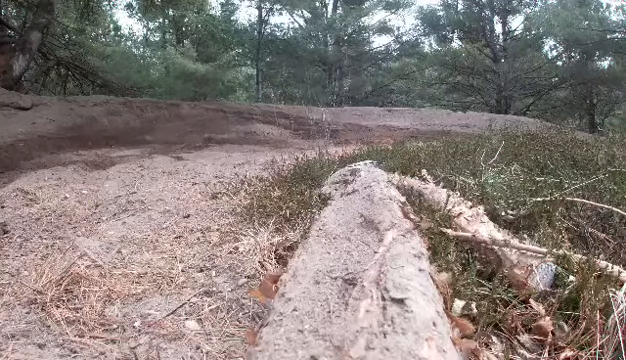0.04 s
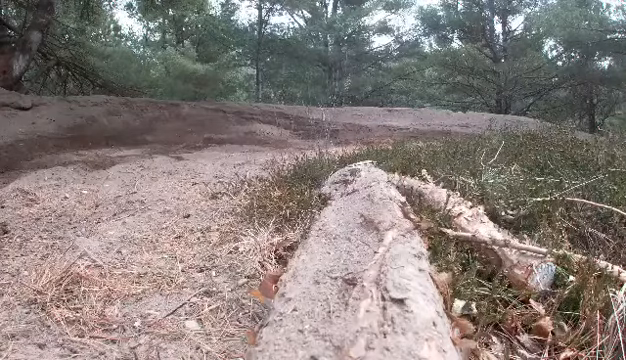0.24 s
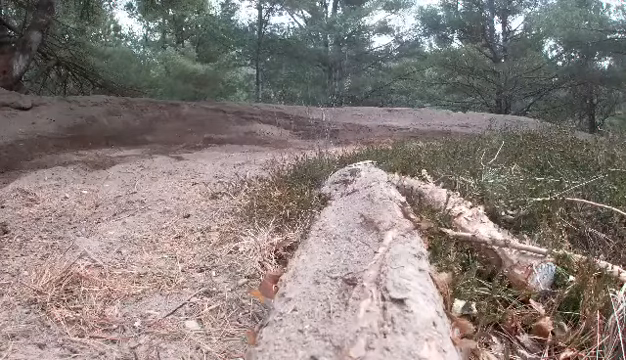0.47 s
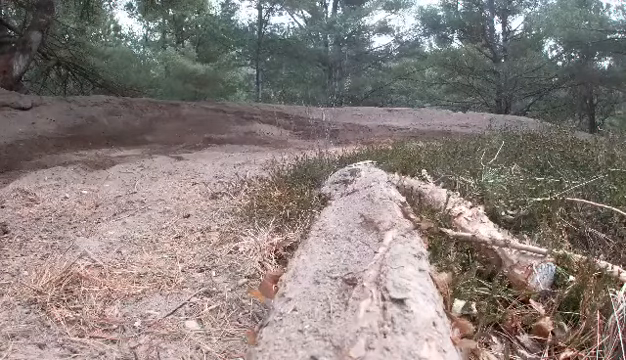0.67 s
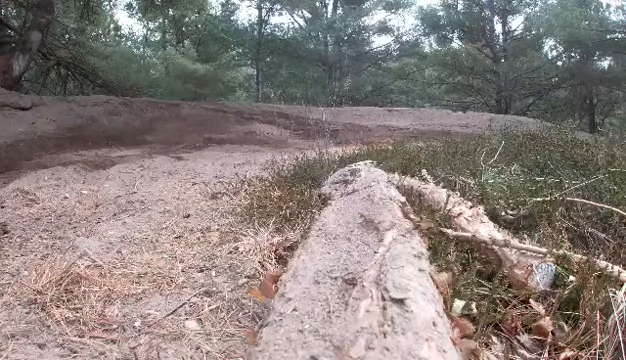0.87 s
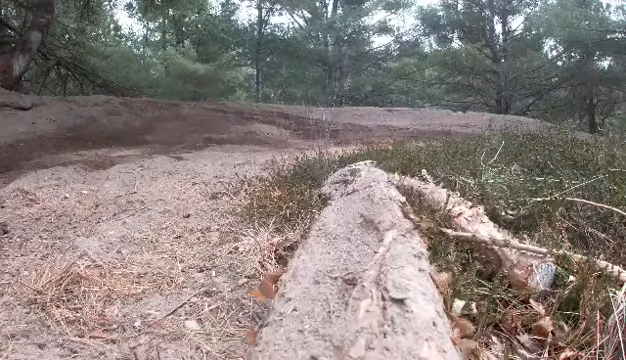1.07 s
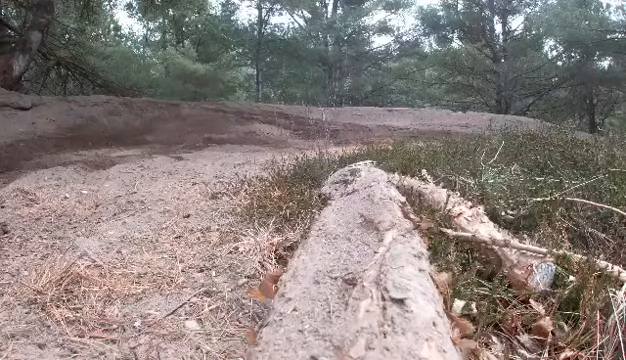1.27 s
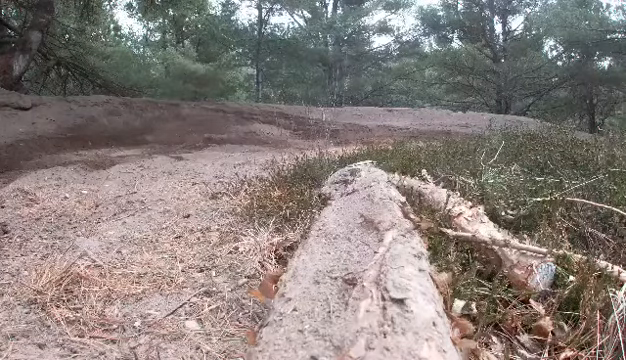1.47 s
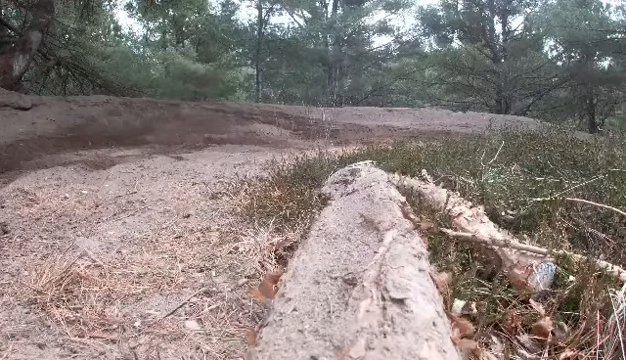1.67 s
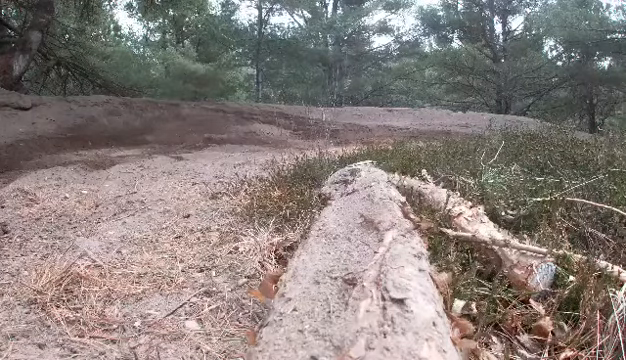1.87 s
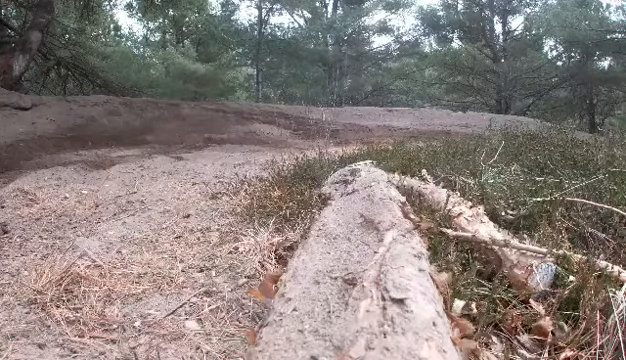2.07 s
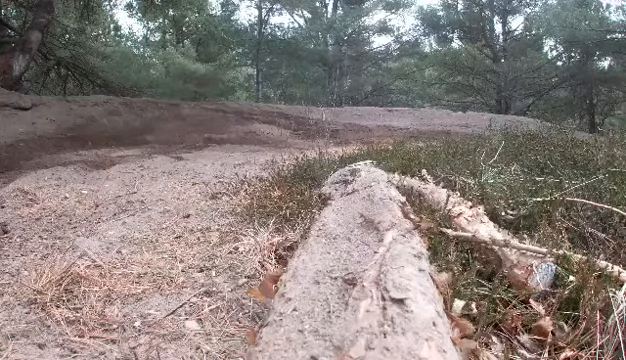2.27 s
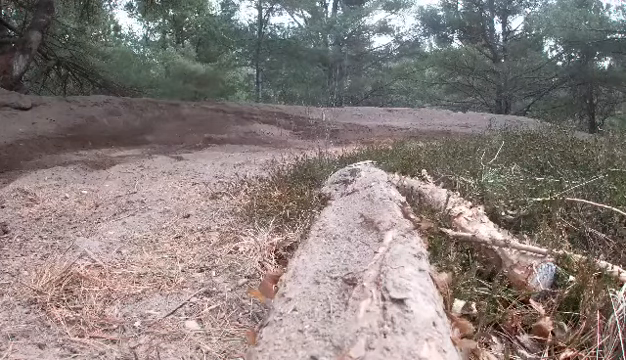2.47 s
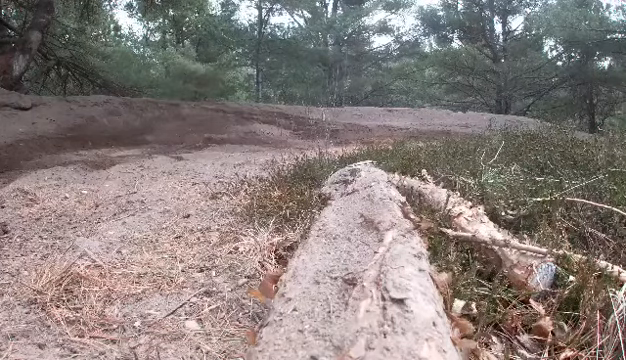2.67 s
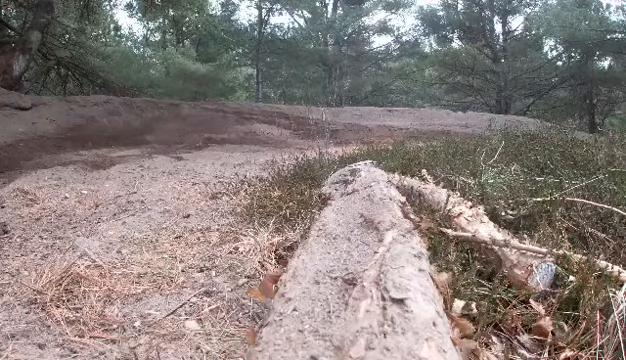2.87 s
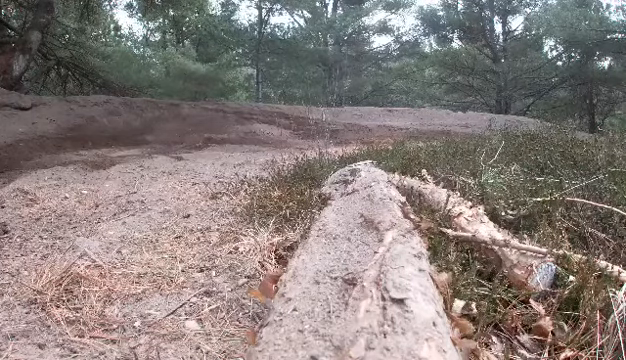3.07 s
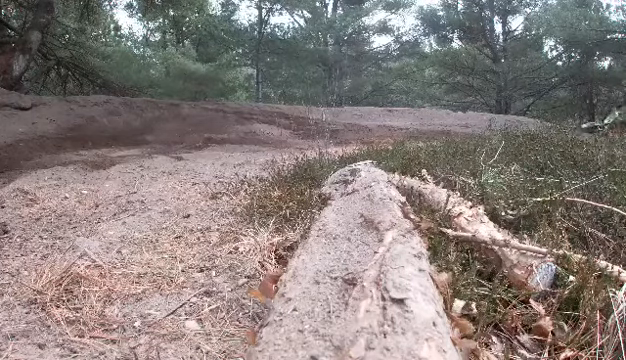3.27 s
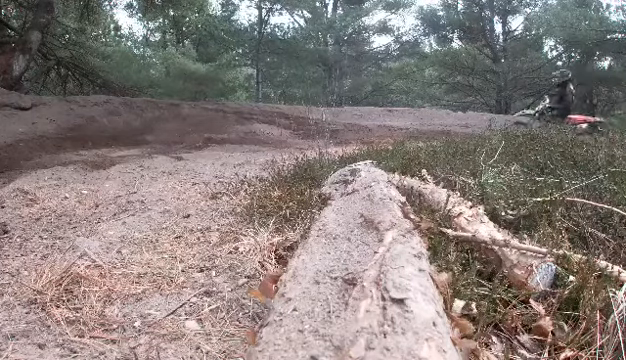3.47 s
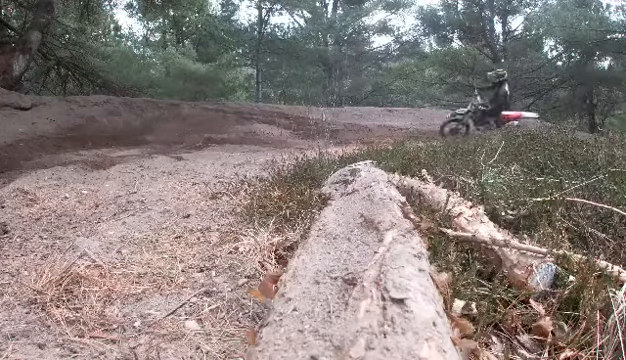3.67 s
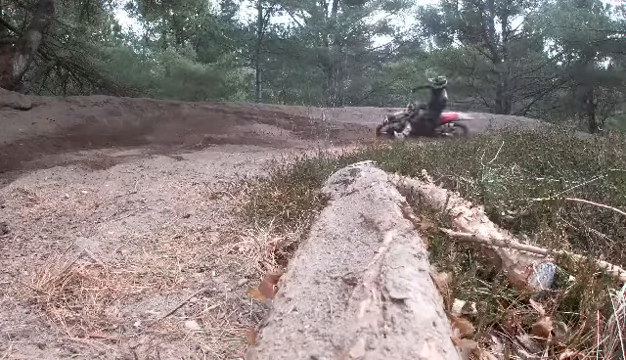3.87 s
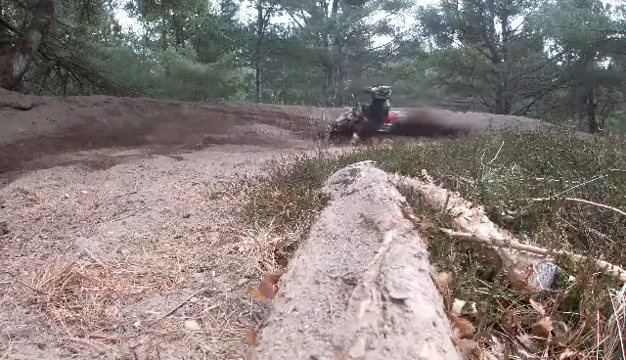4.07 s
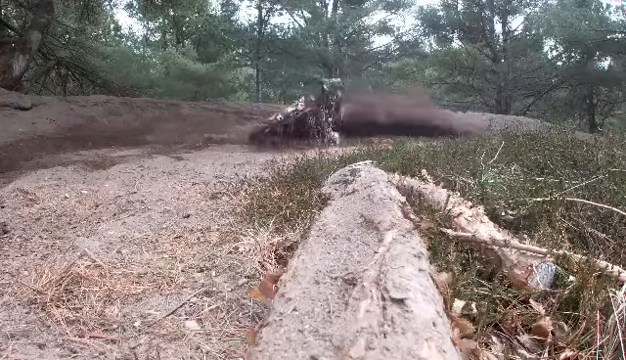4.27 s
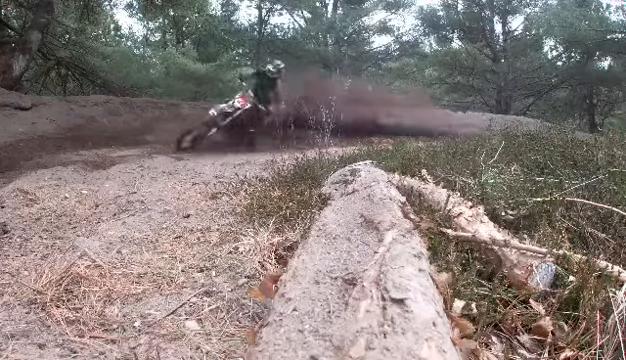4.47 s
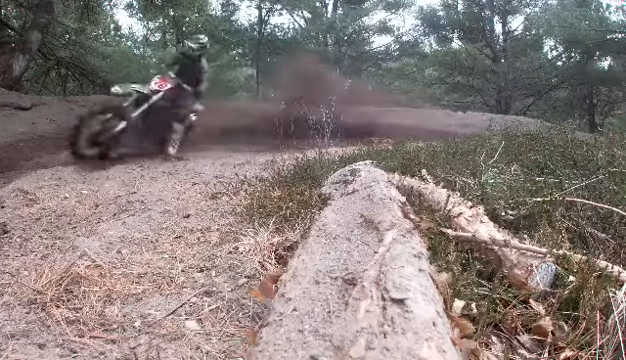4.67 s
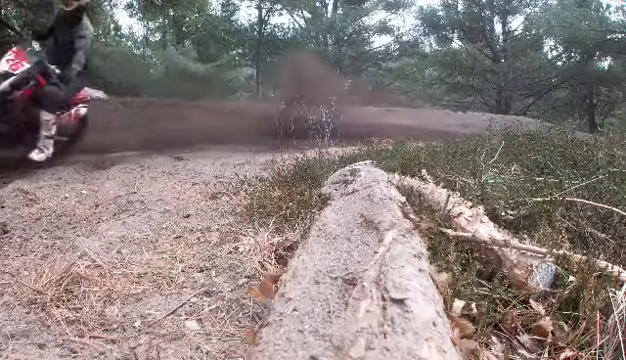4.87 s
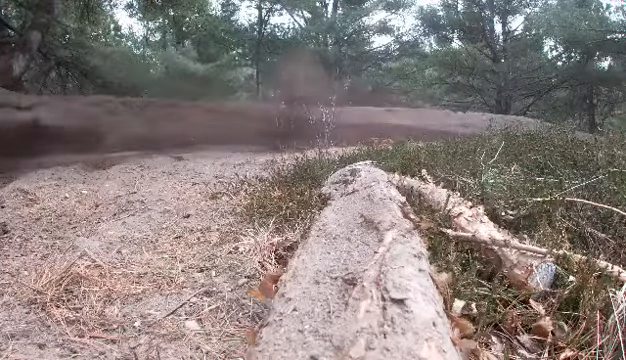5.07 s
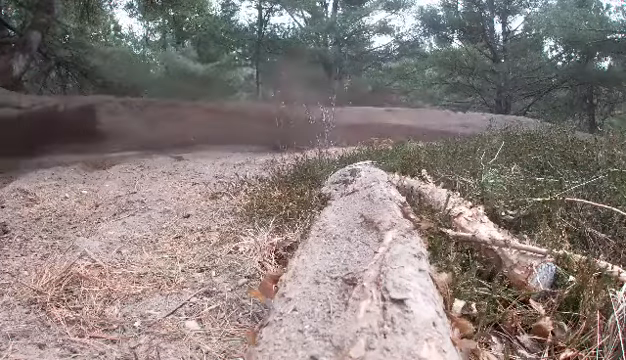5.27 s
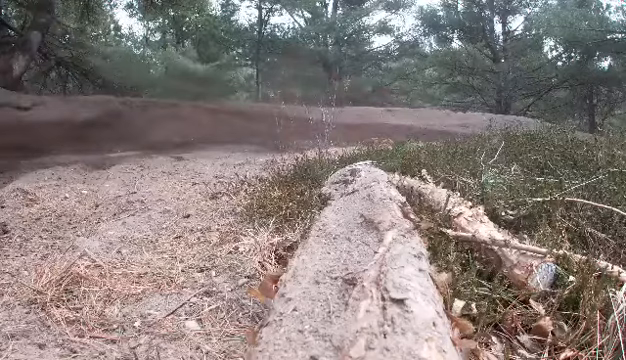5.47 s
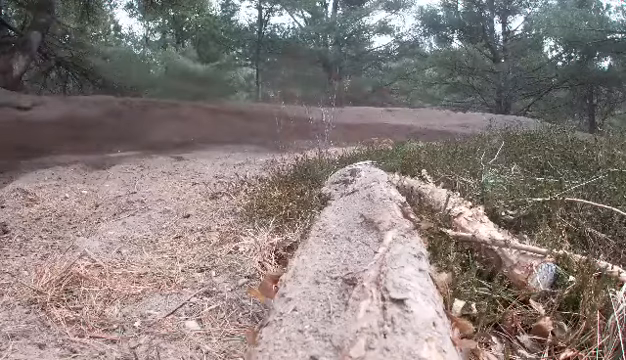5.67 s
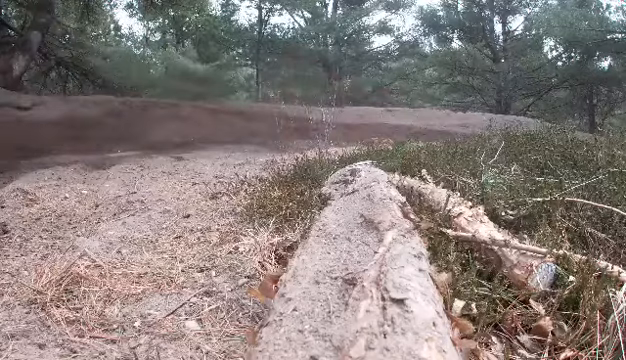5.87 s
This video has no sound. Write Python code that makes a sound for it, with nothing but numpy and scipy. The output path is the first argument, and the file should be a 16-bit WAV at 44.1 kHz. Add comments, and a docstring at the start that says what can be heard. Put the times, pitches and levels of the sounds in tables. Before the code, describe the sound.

Outdoors by a woodland dirt track, a low soft rumble lies underneath. At 0 s a departing dirt bike leaves a wavering low drone and bright hiss, gone by about 0.9 s. Beneath it a four-stroke single idles out of sight, with dull uneven thuds about eighteen per second. It gives a short blip near 1.1 s, settles, then revs from 1.9 s to a muffled peak around 2.5 s, sags, and jabs again at 3.2-3.3 s, with only faint patchy hiss above. Around 3.8-3.9 s it clears the bank: the sound abruptly becomes much louder and brighter, a ripping bark of sharp cracks over hiss. It pulls hard to 4.3 s, eases and drops in pitch to 4.7 s, then surges from 4.85 s, climbing into a heavy, dense, buzzing roar, loudest about 5.0-5.5 s. From 5.6 s the throttle eases, level and pitch fall, crackling continues, and pitch lifts slightly at the 5.9 s end.

```python
"""Over an idling single-cylinder four-stroke dirt bike another bike fades away; the first blips behind a bank in
the woods, then comes into the open, powers through a bend and passes close. Each firing is a puff that rings
the exhaust as a low thud and, in direct sight, a sharp crack of shock front and turbulence. Behind the bank the
treble is a patchy hiss; in the open, cracks ring over a hiss. Filtered noise gives the low rumble of the woods."""
import sys
import numpy as np
from scipy import signal
from scipy.fft import rfft, irfft, next_fast_len
from scipy.io import wavfile
from scipy.ndimage import uniform_filter1d

SR = 44100
rng = np.random.default_rng(int(sys.argv[2]) if len(sys.argv) > 2 else 0)


def elevation(decibels):
    """Turn decibel levels (scalar or array-like) into linear amplitude ratios."""
    levels = np.asarray(decibels, float)
    return 10 ** (levels / 20)


def wrap_up_sound(samples):
    """Save the sound to the file named by the first command line argument, as 16-bit audio."""
    columns = np.atleast_2d(samples).T
    # keep every value between -1 and 1, then stretch to whole-number steps
    tamed = np.clip(columns, -1, 1)
    steps = np.round(tamed * 32767).astype(np.int16)
    wavfile.write(sys.argv[1], SR, steps)


N = 261513


def in_time(rows):
    """Columns of a curve, one value a sample; the first column of rows is time in seconds."""
    s, *columns = np.transpose(rows)
    return [np.interp(np.arange(N) / SR, s, c) for c in columns]


def colour(x, points):
    """Minimum-phase filter through (Hz, dB) points, by folding the cepstrum."""
    size = next_fast_len(N + 8192)
    hz, db = np.transpose(points)
    grid_hz = np.maximum(np.arange(2049) * SR / 4096, 1)
    log_gain = np.interp(np.log(grid_hz), np.log(hz), db) * np.log(10) / 20
    cepstrum = irfft(log_gain)
    cepstrum[1:2048] *= 2
    cepstrum[2049:] = 0
    impulse = irfft(np.exp(rfft(cepstrum)))
    return irfft(rfft(x, size) * rfft(impulse, size), size)[..., :N]


def resonance(x, hz, width_hz):
    """Two-pole resonance with gain 1 on top."""
    r = np.exp(-np.pi * width_hz / SR)
    b = [(1 - r * r) / 2, 0, (r * r - 1) / 2]
    a = [1, -2 * r * np.cos(2 * np.pi * hz / SR), r * r]
    return signal.lfilter(b, a, x)


def even(x):
    """Running rms brought to 1."""
    power = uniform_filter1d(uniform_filter1d(x ** 2, 5000), 5000)
    return x / np.sqrt(np.maximum(power, 0) + 1e-14)


def cut(x, hz, kind):
    """Steep high- or low-pass."""
    return signal.sosfilt(signal.butter(4, hz, kind, fs=SR, output="sos"), x)


def nearly_mono(spectrum, side_db):
    """Coloured noise, mid of rms 1, slightly different in the two channels."""
    mid, side = colour(rng.standard_normal((2, N)), spectrum)
    return (mid + elevation(side_db) * side * [[1], [-1]]) / np.std(mid)


def drift(rate_per_s):
    """Slow random curve of spread about 1."""
    return np.interp(np.arange(N) * rate_per_s / SR, np.arange(200), rng.standard_normal(200)) * 1.2


def low_exhaust(turns, at, near, steady, thud_db, bark_db, crank_db):
    """Puffs ring the exhaust as thud and bark; revving adds a clean note, the open adds crank hum and rasp."""
    # Modes of the exhaust. Each row: centre in Hz, width in Hz, relative level in dB.
    thud_modes = [(84, 119, -4.5), (145.6, 85.7, 3), (186.7, 51.5, -4)]
    bark_modes = [(240.4, 93, 10), (343, 100, 1), (469, 23, -10.5)]
    # Turbulent roughness of the exhaust. Each row: frequency in Hz, relative density in dB per Hz.
    rasp_spectrum = [(30, -16), (60, -12), (150, -9), (350, -12), (470, -13), (700, -37), (1000, -51)]
    # Clean orders above the bark, in the open. Each row: time in seconds, level over thud in dB.
    upper_orders = [(3.8, -18), (4.25, -20), (4.45, -6), (4.85, -5), (5.07, -19), (5.2, -16.5),
                    (5.55, -12.5), (5.72, -34), (5.93, -22)]
    firing_tone_db, crank_overtone_db = -16, -21   # over thud
    thud_yields = .4   # share by which the thud gives way to the far note
    knock_db = -27   # top of the far thump over bark

    puffs = firing_puffs(at, near, steady)
    echoed = with_echoes(puffs, near)
    far = thump(echoed)
    # from behind the bank the note is narrower
    behind = cut(cut(echoed, 490, "low"), 65.0, "high")
    heard = behind * (1 - near) + cut(echoed, 560, "low") * near

    crank = near * elevation(crank_db) * np.sqrt(2) * np.cos(4 * np.pi * turns + 0.032)
    thud = (pipe(heard, thud_modes, cut_hz=49.5) + crank) / np.sqrt(1 + near * elevation(2 * crank_db))
    thud = near * thud + (1 - near) * far
    thud += near * elevation(firing_tone_db) * np.cos(2 * np.pi * turns + 12.3)
    thud += near * elevation(crank_overtone_db) * np.sqrt(2) * np.cos(8 * np.pi * turns + 0.5)
    thud += (1 - near) * steady * (far_note(turns) - thud_yields * thud)

    bark = elevation(bark_db - 2.9 * (2.5 - near)) * pipe(heard, bark_modes, cut_hz=222)
    # rasp grows half as fast in dB as the thud
    rasp = near * elevation(-48 + .5 * (thud_db + 40)) * nearly_mono(rasp_spectrum, side_db=-24)
    upper_band = even(cut(cut(puffs, 410, "high"), 800, "low"))
    upper = near * elevation(thud_db + in_time(upper_orders)[0]) * upper_band
    knock = (1 - near) * elevation(bark_db + knock_db) * even(cut(cut(puffs, 330, "high"), 450, "low"))
    return elevation(thud_db) * thud + bark + rasp + upper + knock


def firing_puffs(at, near, steady):
    """One pressure puff a firing, uneven behind the bank; at idle there many are followed by a weaker beat."""
    afterbeat_share, afterbeat_db = .6, -4.5
    puffs = np.full(N, 1e-18)
    early = (SR * (0.00388 + 0.00326 * near[at])).astype(int)   # the thud leads the crack
    jitter_s = .0012 * rng.standard_normal(len(at)) * (1 - near[at]) * (1 - .7 * steady[at])
    early += (SR * jitter_s).astype(int)
    puffs[at - early] = -elevation(rng.standard_normal(len(at)) * (3.4 - 2.6 * near[at]))
    chance, late = rng.random((len(at), 2)).T
    after = np.minimum(at + (SR * (.012 + .022 * late)).astype(int), N - 1)
    followed = chance < afterbeat_share * (1 - steady[at])
    puffs[after] -= elevation(afterbeat_db) * followed * (1 - near[at])
    return puffs


def with_echoes(puffs, near):
    """Bank and trunks return delayed copies, 8 dB weaker in the open."""
    # Each row: delay in seconds, level behind the bank in dB.
    echo_rows = [(.0085, -21), (0.02, -10.5), (0.031, -13), (0.041, -27)]
    heard = puffs.copy()
    for delay_s, db in echo_rows:
        lag = int(delay_s * SR)
        heard[lag:] += elevation(db - 8 * near[lag:]) * puffs[:-lag]
    return heard


def pipe(puffs, modes, cut_hz):
    """Pressure puffs ring the exhaust pipe in modes of alternating sign."""
    rings = sum((-1) ** k * elevation(db) * resonance(puffs, hz, width_hz)
                for k, (hz, width_hz, db) in enumerate(modes))
    return even(cut(rings, cut_hz, "high"))


def thump(puffs):
    """Each puff heard from afar: a sudden, short tone that starts high and sags in pitch."""
    end_hz, drop_hz, drop_s = 118, 200, .003
    lag_s, rise_s, fall_s = .005, .0015, .009
    t = np.maximum(np.arange(2600) / SR - lag_s, 0)
    cycles = end_hz * t + drop_hz * drop_s * (1 - np.exp(-t / drop_s))
    shape = np.sin(2 * np.pi * cycles) * np.exp(-t / fall_s) * (1 - np.exp(-t / rise_s))
    return even(signal.fftconvolve(-puffs, shape)[:N])


def far_note(turns):
    """Revving behind the bank: the engine orders near the note's centre, as clean tones."""
    # Strongest region of the note. Each row: time in seconds, centre in Hz.
    note_centre = [(1.05, 135.6), (1.3, 109), (2.2, 137), (2.53, 205), (2.66, 150), (2.8, 135), (3.15, 138),
                   (3.32, 140), (3.7, 104.7)]
    width_hz = 46
    centre_hz, rate = in_time(note_centre)[0], np.gradient(turns) * SR
    return sum(np.exp(-((k * rate - centre_hz) / width_hz) ** 2) * np.sin(2 * np.pi * k * turns)
               for k in range(2, 9))


def swells_and_dips():
    """Brief swells and dips of thud, bark and treble, each coming quickly and dying away."""
    # Each row: time in seconds, change of thud in dB, of bark over thud in dB, of treble in dB.
    change_rows = [(1.035, 9, 6, 5), (1.4, 1.5, -15, 2), (1.72, -9, 12, 5.5), (2.55, -3.5, 14, 4),
                   (3.204, 3, 19.5, 4.5), (3.3, 8, -4, 2.5)]
    onset_s, decay_s = 0.045, 0.12
    s, *changes_db = np.transpose(change_rows)
    since = np.arange(N) / SR - s[:, None]
    onset = np.clip(1 + since / onset_s, 0, 1)
    decay = np.exp(-np.abs(since) / decay_s)
    return np.array(changes_db) @ np.where(since < 0, onset, decay)


def treble(at, near, level_db, top_db, low_hz, high_hz, low_db, high_db, crack_db, burst_db):
    """Cracks over hiss in a lower and a top part, each with its own level; the hiss is patchy behind the bank."""
    # Colours in the open and behind the bank. Each row: frequency in Hz, relative density in dB per Hz.
    open_spectrum = [(290, -44), (500, -23), (680, -10), (1050, -2), (1500, -6.5), (3570, -3.5), (5690, -1),
                     (7460, -6), (9670, -12.5), (11000, -23.5), (14300, -123), (22000, -120)]
    far_spectrum = [(350, -42), (600, -11), (1280, -4.5), (3680, -3.5), (7010, -7.5), (9740, -20.5),
                    (11000, -25), (14300, -105), (22000, -120)]
    share = elevation(crack_db - 16.0 * (1 - near))
    sharp = colour(cracks(at, low_hz, high_hz, low_db, high_db, burst_db), open_spectrum)
    tail = rng.standard_normal(6000) * np.exp(-np.arange(6000) / SR / 0.012)   # noisy tail of each crack
    hiss = even(signal.fftconvolve(sharp, tail)[:N]) * near * elevation(-2.5)
    hiss = hiss + near * nearly_mono(open_spectrum, side_db=-27.0)
    hiss = hiss + (1 - near) * patchy(nearly_mono(far_spectrum, side_db=-34.0))
    both = share * even(sharp) + even(hiss)
    lower = even(cut(both, 3660, "low"))
    top = even(cut(cut(both, 2444, "high"), 19100, "low"))
    return elevation(level_db) * lower + elevation(top_db) * top


def cracks(at, low_hz, high_hz, low_db, high_db, burst_db):
    """A shock front and a short, brighter burst of turbulence per firing, swelling in two moving resonances."""
    # Shock front, soft until the bike is near and again as it rides off.
    # Each row: time in seconds, relative front strength.
    front_rows = [(3.85, .45), (4.05, .85), (5.5, .8), (5.72, .45)]
    lag_s, alike = .0008, .55   # turbulence follows the front, much like the burst before
    ring_width, ring_scatter = .52, .045   # width over pitch; pitch spread from firing to firing
    jitter_s = .00007
    out, t = np.zeros(N + 2048), np.maximum(np.arange(1024) / SR - lag_s, 0)
    shape = np.exp(-t / .0022) * (1 - np.exp(-t / .0006))
    fresh = np.diff(rng.standard_normal((len(at), 1025)))
    eddies = signal.lfilter([np.sqrt(1 - alike ** 2)], [1, -alike], fresh, axis=0)
    front, = in_time(front_rows)
    for i, eddy, (slip, low_off, high_off) in zip(at, eddies, rng.standard_normal((len(at), 3))):
        low_ring = low_hz[i] * (1 + ring_scatter * low_off)
        high_ring = high_hz[i] * (1 + ring_scatter * high_off)
        start = i + int(round(SR * jitter_s * slip))
        burst = elevation(burst_db[i]) * eddy * shape
        spit = burst.copy()   # the top end is mostly turbulence
        spit[0], burst[0] = -.3 * front[i], -1.01 * front[i]
        low = resonance(burst, low_ring, ring_width * low_ring)
        low = resonance(low, low_ring, ring_width * low_ring)
        burst[0] = -0.52 * front[i]
        high = resonance(burst, high_ring, ring_width * high_ring)
        high = resonance(high, high_ring, ring_width * high_ring)
        strength = elevation(rng.normal(0, 1.1))
        crack = elevation(-2.5) * spit + elevation(low_db[i]) * low - elevation(high_db[i]) * high
        out[start:start + 1024] += strength * crack
    return out[:N]


def patchy(x):
    """Each band of a noise swells and sinks on its own."""
    # Band edges in Hz, one a row.
    edges_hz = [1600, 2800, 4600]
    depth_db, rate_per_s = 2.2, 11.0
    out = 0
    for hz in edges_hz:
        band = signal.sosfiltfilt(signal.butter(2, hz, fs=SR, output="sos"), x)
        out = out + elevation(depth_db * drift(rate_per_s)) * band
        x = x - band
    return out + elevation(depth_db * drift(rate_per_s)) * x


def leaving_bike():
    """A few wavering low orders and a bright hiss that holds, then both die away."""
    # Each row: time in seconds, firings per second, level in dB before a common 4.5 dB cut.
    leaving_rows = [(0, 72, -43), (.15, 84, -46.5), (.27, 74, -57), (.45, 80, -57), (.75, 78, -63.5)]
    # Each row: multiple of the firing rate, relative level in dB.
    orders = [(2, -2.5), (3, 9.5), (4, -1.5), (5, -5)]
    # Each row: frequency in Hz, relative density in dB per Hz.
    hiss_spectrum = [(290, -70), (500, -15), (609, -23), (1270, 2), (1450, -2), (3670, 0.5), (9320, -23),
                     (10500, -43), (11500, -86), (15000, -113), (22000, -120)]
    hiss_db, hold_s, fall_db_per_s = -41, 0.19, 38.5
    rate, level_db = in_time(leaving_rows)
    turns, t = np.cumsum(rate) / SR, np.arange(N) / SR
    alive = np.clip((leaving_rows[-1][0] + 0.23 - t) / 0.15, 0, 1)
    fading_db = hiss_db - fall_db_per_s * np.maximum(t - hold_s, 0)
    hiss = elevation(fading_db) * nearly_mono(hiss_spectrum, side_db=-41)
    tones = sum(elevation(db) * np.sin(2 * np.pi * k * turns + k) for k, db in orders)
    return hiss + alive * elevation(level_db - 4.5) * tones


def woods_rumble():
    """Low coloured noise at a slowly moving level."""
    # Each row: frequency in Hz, relative density in dB per Hz.
    rumble_spectrum = [(12, -53), (20, -9), (48, 3.5), (95, 3.5), (140, -14), (210, 2), (512, -24),
                       (700, -37), (910, -30), (1540, -120)]
    # Each row: time in seconds, level in dB.
    rumble_level = [(0, -58.5), (2, -53.5), (3, -52), (3.7, -52), (5.93, -55)]
    return elevation(in_time(rumble_level)[0]) * nearly_mono(rumble_spectrum, side_db=-50)


def scene():
    """Both bikes over the low rumble of the woods."""
    # Engine speed. Each row: time in seconds, firings per second.
    revs = [(0.0, 17.86), (0.91, 18.12), (1.1, 25.75), (1.37, 17.54), (1.82, 17.79), (1.96, 25.49),
            (2.18, 24.8), (2.3, 32.64), (2.46, 38.11), (2.55, 38.7), (2.66, 35.2), (2.96, 29.0),
            (3.11, 27.648), (3.28, 43.22), (3.5, 32.5), (3.7, 26.0), (3.77, 27.85), (3.94, 53.51),
            (4.0, 47.48), (4.15, 51.8), (4.25, 51.52), (4.45, 43.95), (4.69, 39.74), (4.96, 52.98),
            (5.14, 67.14), (5.21, 66.3), (5.28, 69.2), (5.36, 65.9), (5.45, 72.68), (5.57, 71.88),
            (5.78, 52.7), (5.93, 60.83)]
    # Exhaust before swells and dips. Each row: time in seconds, thud in dB, treble in dB.
    exhaust = [(0, -44, -60), (.25, -51, -50.5), (.78, -47, -60), (.9, -47, -58), (1.2, -49.5, -61),
               (1.35, -50, -58.5), (1.63, -47, -60), (1.75, -43, -55.5), (1.84, -40, -57),
               (1.95, -41, -57.5), (2.4, -44.5, -54.5), (2.62, -47.5, -53), (2.85, -44, -54.5),
               (3.15, -50, -55.5), (3.33, -49.5, -53), (3.48, -44.5, -55), (3.7, -48.5, -54.5),
               (3.81, -44.5, -39.5), (3.93, -41.5, -27.5), (4.03, -42.5, -30.5), (4.09, -38, -25.5),
               (4.28, -39.5, -28), (4.43, -43.5, -34.5), (4.61, -43.5, -34), (4.86, -40, -25),
               (5.02, -32.5, -25), (5.25, -30.5, -24.5), (5.5, -33, -24.5), (5.66, -42, -31),
               (5.85, -43.5, -34.5), (5.93, -45.5, -34.5)]
    # Bark in the open. Each row: time in seconds, relative level over thud in dB.
    bark_open = [(3.8, 7), (4.03, 3.5), (4.14, 8), (4.3, 3.5), (4.6, 3), (4.86, 10.5), (5.02, 6),
                 (5.5, 4.5), (5.85, 8)]
    # Each row: time in seconds, top treble over lower treble in dB.
    top_treble = [(.8, -5.5), (1.2, -2.5), (2.2, 1.5), (3, 3.5), (3.7, 3), (3.92, -8), (4.25, -9),
                  (4.45, -3.5), (4.85, -7.5), (5.93, -4)]
    # Two rings of the crack that move with the bike's place.
    # Each row: time in seconds, low ring in Hz, high ring in Hz, low ring in dB, high ring in dB.
    ring_rows = [(3.8, 1120, 2960, 6, 9), (3.93, 1220, 2950, 12, 12), (4.03, 1350, 3020, 10, 12),
                 (4.07, 1800, 4060, 15, 14), (4.12, 2050, 3700, 13, 13), (4.17, 2400, 3300, 8, 15),
                 (4.28, 2100, 3250, 10, 12), (4.33, 1400, 2700, 4, 11), (4.6, 1130, 2870, 3, 9.5),
                 (4.7, 1030, 3650, 2, 9), (4.86, 1100, 3300, 6, 9), (4.95, 1400, 2720, 4, 14),
                 (5.1, 1500, 2900, 7, 10), (5.19, 1400, 3600, 9, 11), (5.29, 1400, 2300, 14, 10),
                 (5.37, 1350, 3200, 12, 13), (5.45, 1300, 3500, 11, 17), (5.53, 1280, 3600, 12, 17.5),
                 (5.62, 1250, 2900, 12, 14), (5.68, 1050, 2700, 4, 16), (5.73, 1000, 2950, 5, 16),
                 (5.8, 1050, 2900, 8, 15), (5.93, 1050, 3100, 4, 15)]
    # Each row: time in seconds, crack over hiss in dB (in the open), turbulence against front in dB.
    crack_rows = [(3.8, 3.5, -14), (3.92, 4, -14.5), (4.03, 2.5, -13), (4.17, 7, -14), (4.35, -1.5, -14.5),
                  (4.6, -1.5, -16.5), (4.7, 2.5, -15), (4.86, -0.2, -13), (5.0, 4, -16), (5.25, 3, -11),
                  (5.45, 4.5, -11.5), (5.6, 4, -12.5), (5.7, 7.5, -16.5), (5.8, 12, -13.5), (5.93, 4, -16)]
    bark_far_db = -8.5   # relative bark over thud behind the bank
    idle_per_s, steady_per_s = 17, 36   # firing is uneven at idle, steadiest from 36 firings/s

    rate, = in_time(revs)
    turns = np.cumsum(rate) / SR   # one turn here is one firing
    at = np.flatnonzero(np.diff(np.floor(turns)) > 0)
    near = np.clip((np.arange(N) / SR - 3.74) / 0.075, 0, 1)   # the bike clears the bank
    steady = np.clip((rate - idle_per_s) / (steady_per_s - idle_per_s), 0, 1)

    thud_db, treble_db = in_time(exhaust)
    thud_change, bark_change, treble_change = swells_and_dips()
    thud_db = thud_db + thud_change
    treble_db = treble_db + treble_change
    bark_db = thud_db + bark_change + (1 - near) * bark_far_db + near * in_time(bark_open)[0]
    crank_db = 7.5 + 2.3 * (rate - 56)   # over thud: 7.5 dB at 56 firings/s, 2.3 dB more per firing/s

    low = low_exhaust(turns, at, near, steady, thud_db, bark_db, crank_db)
    top_db = treble_db + in_time(top_treble)[0]
    high = treble(at, near, treble_db, top_db, *in_time(ring_rows), *in_time(crack_rows))
    return low + woods_rumble() + leaving_bike() + high


def band_limit(x):
    """A steep low-pass at the top of the band."""
    return signal.sosfilt(signal.butter(12, 14400, fs=SR, output="sos"), x)


def record(dry):
    """A thin hiss near 12.5 kHz, stronger at right, flickers and swells steeply with the treble; the top is cut."""
    level_db = 10 * np.log10(uniform_filter1d(cut(dry[1], 7500, "high") ** 2, 1200) + 1e-14)
    band = signal.butter(5, [12050, 13150], "band", fs=SR, output="sos")
    thin = signal.sosfilt(band, rng.standard_normal((2, N)))
    thin_db = 1.483 * level_db + 3.0 * drift(14) + [[25], [37]]   # left, right
    heard = cut(cut(dry, 11270, "low"), 11650, "low") + thin * elevation(thin_db)
    heard = signal.sosfilt(signal.cheby2(12, 70, 13700, fs=SR, output="sos"), heard)
    return band_limit(heard)


dry = scene()
out = record(dry)
wrap_up_sound(out)
```